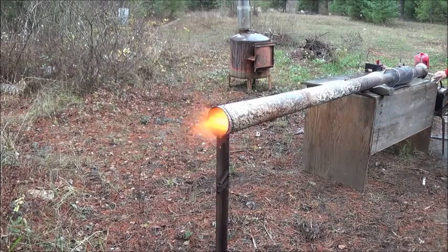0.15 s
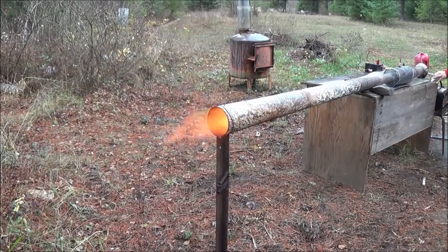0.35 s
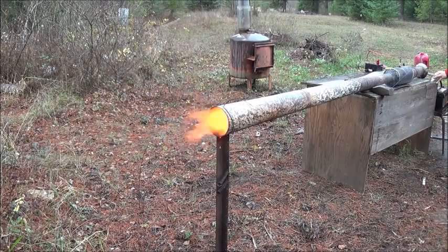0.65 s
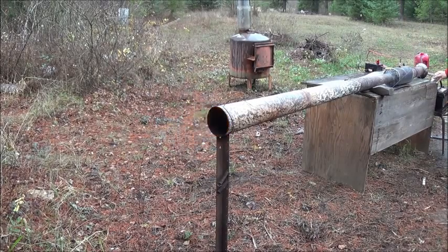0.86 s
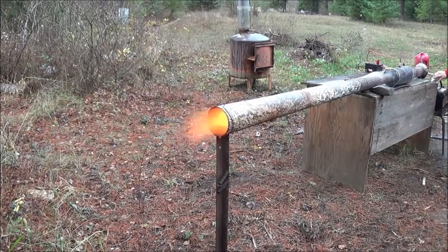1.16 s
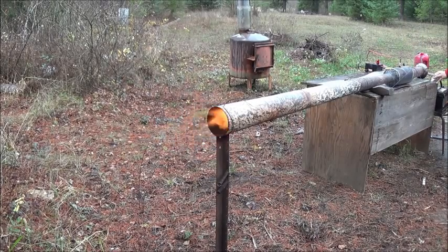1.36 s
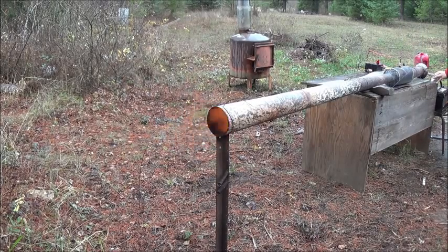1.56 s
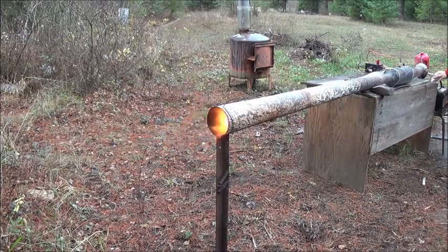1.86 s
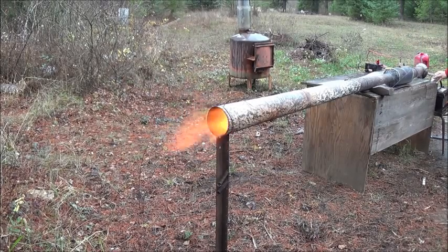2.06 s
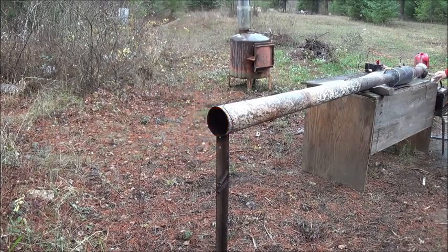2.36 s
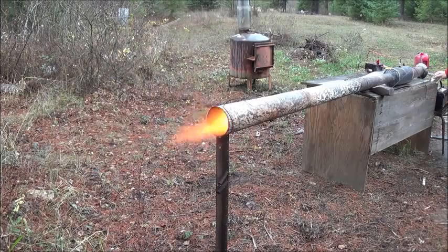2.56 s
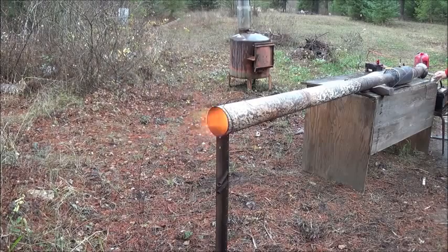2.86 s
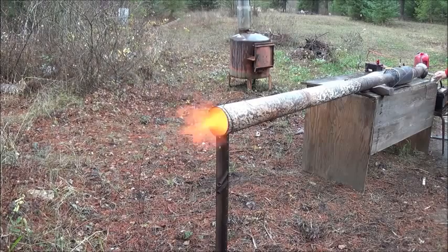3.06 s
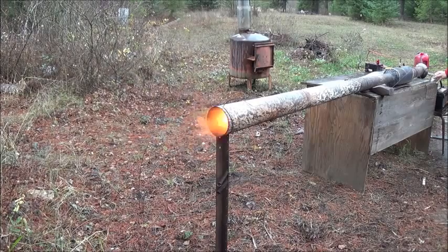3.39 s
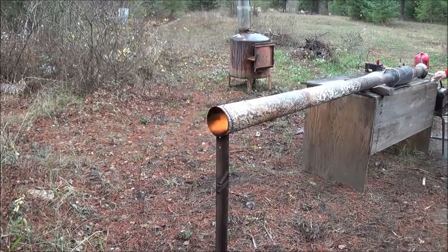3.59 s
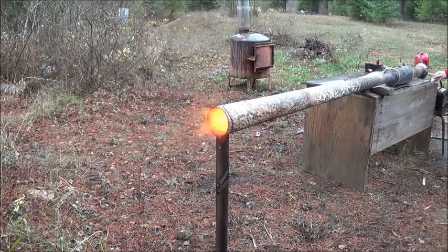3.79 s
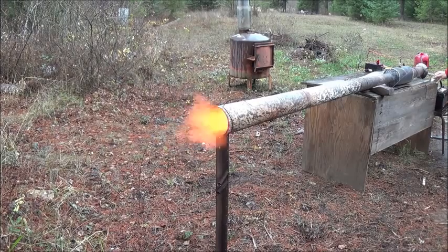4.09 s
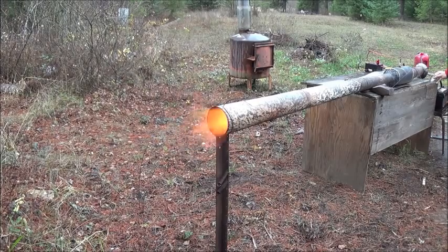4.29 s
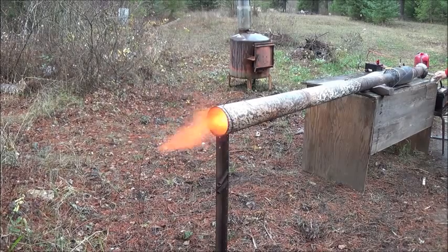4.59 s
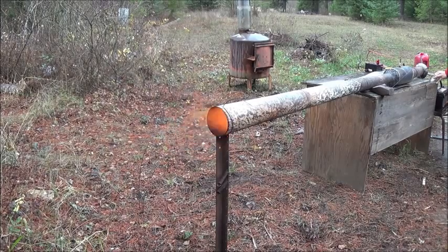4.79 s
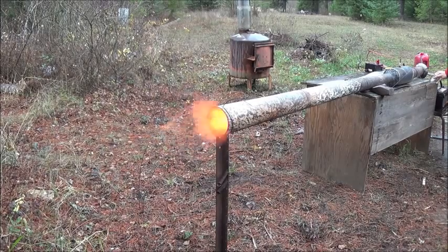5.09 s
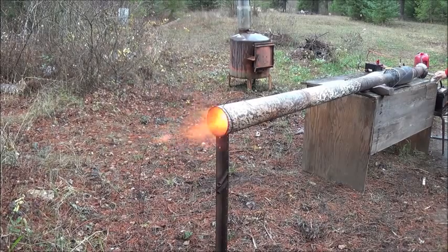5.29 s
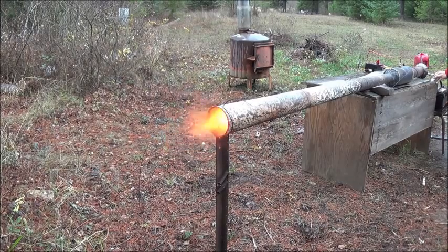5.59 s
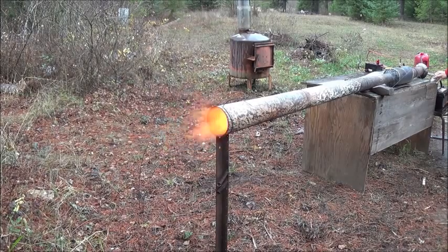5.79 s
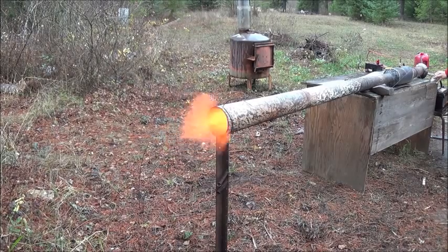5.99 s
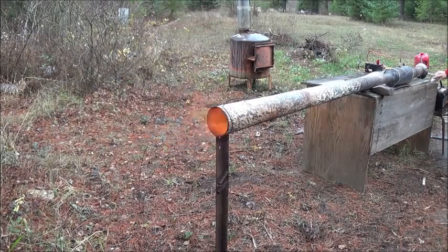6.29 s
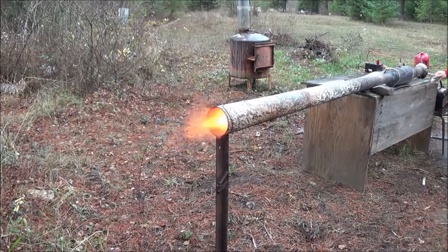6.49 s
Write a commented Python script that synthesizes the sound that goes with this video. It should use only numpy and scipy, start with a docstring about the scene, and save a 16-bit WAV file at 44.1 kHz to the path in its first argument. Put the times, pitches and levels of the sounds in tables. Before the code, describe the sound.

Continuous deep blare of a pulsed combustion engine outdoors, already running at the start and still running at the end. The pitch stays near a low A, trembling slightly. Torn, gritty gas noise and brighter hiss pulse with each firing and swell in short flares. Scattered hard snaps and hollow barks pop out. Midway the drone sags, hiccups once and recovers. The microphone is near, the sound dry, with low rumble beneath.

```python
"""Outdoors over soil, a large pulse jet fires about 107 times a second, a few metres from the microphone.
Each explosion sends a pressure pulse and a gust of turbulent gas down the long tailpipe: drone and roar.
The flame at the mouth rasps and hisses in uneven flares, and now and then a firing cracks sharply.
Halfway through, the combustion sags, stumbles once and picks up again; a low rumble lies underneath."""
import sys
import numpy as np
from scipy.fft import rfft, irfft, next_fast_len
from scipy.io import wavfile
from scipy.ndimage import map_coordinates

SR = 44100
rng = np.random.default_rng(int(sys.argv[2]) if len(sys.argv) > 2 else 0)


def waveform_to_disk(signal):
    """Save audio, clipped to [-1, 1], as 16-bit WAV at the path in sys.argv[1]."""
    frames = np.transpose(np.atleast_2d(signal))
    scaled = np.clip(frames, -1, 1) * 32767
    samples = np.round(scaled).astype(np.int16)
    wavfile.write(sys.argv[1], SR, samples)


N = 293265  # length in samples

# low, torn part of the jet turbulence, relative levels: freq_hz [Hz], level_db [dB per Hz]
RASP_SPECTRUM = [(400, 1), (1000, 3), (1800, 4), (2400, 1.5), (3300, 1.5), (5300, -7), (7000, -15),
                 (10000, -13), (16000, -58)]
# high part of the jet turbulence, relative levels: freq_hz [Hz], level_db [dB per Hz]
HISS_SPECTRUM = [(2000, -5.5), (5000, -2), (7200, -8.5), (8800, 1), (10200, 3), (11800, -1), (13500, -19),
                 (15600, -61)]


def amp(db):
    """Decibels to gain."""
    return 10 ** (np.asarray(db) / 20)


def unit(x):
    """Scale to rms 1."""
    return x / np.sqrt(np.mean(x ** 2) + 1e-20)


def along(points, hz, axis=1):
    """Read one column of a frequency table on a log axis."""
    table = np.transpose(points)
    return np.interp(np.log(hz + 1), np.log(table[0] + 1), table[axis])


def curve(rows):
    """One value per sample from a table of time and value."""
    time_s, value = np.transpose(rows)
    return np.interp(np.arange(N) / SR, time_s, value)


def wobble(rate):
    """A smooth random curve around zero, rate knots a second."""
    knots = rng.standard_normal(N // 16)
    position = np.arange(N) * rate / SR + 2
    return map_coordinates(knots, [position], mode="wrap")


def filtered(x, response):
    """x times a complex response of frequency."""
    size = 2 * next_fast_len(N)
    hz = np.fft.rfftfreq(size, 1 / SR)
    return irfft(rfft(x, size) * response(hz), size)[..., :N]


def coloured(x, spectrum):
    """Causal filter with the given (Hz, dB) shape."""
    def response(hz):
        # folding the cepstrum onto positive time gives minimum phase
        cepstrum = irfft(np.log(amp(along(spectrum, hz))))
        cepstrum[1:len(hz) - 1] *= 2
        cepstrum[len(hz):] = 0
        return np.exp(rfft(cepstrum))
    return filtered(x, response)


def noise(side_db):
    """Stereo white noise, mostly common to both microphone ports."""
    mid, side = rng.standard_normal((2, N))
    side = amp(side_db) * side
    return unit(np.array([mid + side, mid - side]))


def ground(x):
    """The bounce off the soil hollows the sound at regular steps; leaf litter soaks up its treble."""
    delay_s = .00248  # by which the bounce trails the direct sound

    def direct_and_bounce(hz):
        delayed = np.exp(-2j * np.pi * hz * delay_s)
        return 1 + .4 * delayed / (1 + (hz / 3500) ** 2)
    return filtered(x, direct_and_bounce)


def firing_cycle():
    """Running count of firings: the rate drifts around the pipe's own note and single firings slip."""
    # drift of the firing rate, before the quick wander: time_s [s], rate_hz [Hz]
    rate_drift = [(0, 105.5), (.35, 108.3), (.6, 106.4), (.93, 107.3), (1.1, 108.7), (1.8, 107.5),
                  (2.45, 105.9), (3.25, 108.5), (3.82, 106.6), (4.0, 108.9), (4.3, 108.5), (4.55, 105),
                  (4.82, 108.6), (5.25, 105.8), (5.95, 108.1), (6.65, 108)]
    wander_hz, slip_cycles = 1.895, 0.023  # both per unit of wobble
    rate_hz = curve(rate_drift) + wander_hz * wobble(26)
    return np.cumsum(rate_hz) / SR + slip_cycles * wobble(48)


def firings(cycle, scatter_s, size_db):
    """One impulse per cycle; each charge ignites a little early or late, with its own force."""
    starts = np.interp(np.arange(int(cycle[-1]) + 1), cycle, np.arange(N))
    timing, force = rng.standard_normal((2, len(starts)))
    at = np.clip(np.round(starts + scatter_s * SR * timing), 0, N - 1).astype(int)
    return np.bincount(at, amp(size_db * force), N)


def drone(cycle):
    """Each firing pushes air out of the mouth and then sucks it back about as hard."""
    # pressure pulse of one firing, relative levels: freq_hz [Hz], level_db [dB]
    blast_spectrum = [(30, -75), (70, -2.5), (105, 6), (150, -6), (185, 1.5), (225, 8), (280, -6),
                      (335, 1.5), (430, 1), (490, -19), (900, -29), (2000, -82.5)]
    pulses = firings(cycle, scatter_s=0.00031, size_db=1.42) * amp(1.08 * wobble(28))
    push_then_suck = -1j  # a quarter turn makes each pulse swing both ways
    return unit(filtered(coloured(pulses, blast_spectrum), lambda hz: push_then_suck))


def gust(cycle, rise, fall, rest_db):
    """Gain that leaps at each firing and dies away within the cycle; times in cycles."""
    age = cycle % 1
    return (1 - np.exp(-age / rise)) * np.exp(-age / fall) + amp(rest_db)


def roar(cycle):
    """Gusts of burning gas ring the tailpipe's resonances."""
    # gas in the tailpipe, relative levels: freq_hz [Hz], level_db [dB per Hz]
    pipe_spectrum = [(70, -21), (145, -3.5), (250, -9), (360, -8.5), (412, 2), (450, -8.5), (500, -11.5),
                     (605, -5), (670, -16.5), (780, -12), (1030, -18.5), (1280, -18.5), (1600, -24.5),
                     (1900, -32), (3500, -52.5)]
    force = gust(cycle, rise=0.017, fall=0.29, rest_db=-11.5) * amp(1.42 * wobble(90))
    return unit(ground(coloured(noise(side_db=-19.5) * force, pipe_spectrum)))


def pipe(cycle):
    """Drone and roar follow the strength of the combustion, which sags for a while in the middle."""
    # strength of the combustion: time_s [s], level_db [dB]
    strength = [(0, -0.1), (2.7, 0), (2.9, -1.9), (3.35, -2.4), (3.55, 0), (4.65, -0.1), (5.0, -0.5),
                (6.65, -0.2)]
    blast_db, roar_db = -10, -18.5  # levels at full strength
    return amp(curve(strength)) * (amp(blast_db) * drone(cycle) + amp(roar_db) * roar(cycle))


def gate(cycle, centre, depth_db):
    """Gain that peaks once a cycle, while gas rushes out."""
    return amp(depth_db * np.cos(np.pi * (cycle - centre)) ** 4)


def flares(t):
    """Unburnt fuel flares at the mouth: rise of rasp and hiss in dB, each with its own flicker."""
    # flares: centre_s [s], length_s [s], rasp_rise_db [dB], hiss_rise_db [dB]
    fuel_flares = [(.08, .14, 5, 1), (.17, .06, 0, 5), (.3, .11, 7, 4), (.45, .05, 6, 7), (.74, .04, 7, 4),
                   (.86, .1, 3, 4), (1.0, .045, 5, 9), (1.08, .04, 1, 6), (1.33, .045, 3, 7),
                   (1.77, .1, 5, 5), (1.98, .13, 3, 5), (2.14, .06, 3, 5), (2.29, .11, 3, 7),
                   (2.63, .1, 4, 6), (3.13, .13, 5, 3), (3.45, .05, 4, 8), (3.64, .11, 6, 6),
                   (3.8, .11, 3, 6), (3.97, .11, 4, 3), (4.12, .05, 5, 5), (4.48, .11, 1, 8),
                   (4.93, .06, 4, 5), (5.15, .05, 5, 9), (5.33, .07, 1, 8), (5.52, .12, 2, 6),
                   (5.92, .04, 6, 5), (6.1, .16, 4, 5), (6.26, .04, 2, 7), (6.56, .06, 4, 3)]
    flicker_db, flicker_per_s = 0.9, 20  # dB per unit of wobble, knots a second
    rise_db = np.zeros((2, N))
    for centre_s, length_s, rasp_db, hiss_db in fuel_flares:
        swell = np.exp(-(2 * (t - centre_s) / length_s) ** 2)
        rise_db += np.outer([rasp_db, hiss_db], swell)
    return rise_db + flicker_db * np.array([wobble(flicker_per_s), wobble(flicker_per_s)])


def jet(cycle, t):
    """Each slug of gas tears at the air; the flame flares unevenly from cycle to cycle."""
    rasp_rise_db, hiss_rise_db = flares(t)
    uneven = amp(0.75 * wobble(30) + 1.81 * wobble(170))
    rasp_force = uneven * gate(cycle, centre=0.061, depth_db=4.5) * amp(1.3 * wobble(60))
    hiss_force = uneven * gate(cycle, centre=0.11, depth_db=5.5) * amp(1.6 * wobble(35))
    rasp = unit(ground(coloured(noise(side_db=-11.0) * rasp_force, RASP_SPECTRUM)))
    hiss = unit(coloured(noise(side_db=-8.0) * hiss_force, HISS_SPECTRUM))
    # base levels are those between flares
    return amp(-39 + rasp_rise_db) * rasp + amp(-44 + hiss_rise_db) * hiss


def stumble(t):
    """Gain that dips briefly where the flame nearly goes out."""
    # stumbles: centre_s [s], half_length_s [s], depth_db [dB]
    stumbles = [(3.423, .015, -7)]
    return amp(sum(db * np.exp(-((t - s) / half) ** 2) for s, half, db in stumbles))


def cracks(cycle, t, width_s, crack_db, bark_db):
    """A hard firing barks through the pipe and leaves the mouth with a burst of sharp noise."""
    # hard firings, relative levels: time_s [s], crack_level_db [dB], bark_level_db [dB]
    hard_firings = [(0.2733, -23, -18), (0.4489, -14, -26), (0.7397, -11, -21), (0.7846, -14, -37),
                    (0.8614, -22, -28), (1.7604, -18, -30), (2.1156, -12.5, -40), (2.2518, -23, -17.5),
                    (2.8275, -20, -20), (2.8833, -21.5, -19), (3.0131, -14.5, -34), (3.0599, -13, -28),
                    (3.1183, -28, -25), (3.6187, -7, -14.5), (3.6592, -15, -21), (4.2114, -33, -27),
                    (4.9784, -45, -28), (5.8192, -15.5, -36), (5.9224, -26, -18.5), (6.1804, -34, -19)]
    # body of a hard firing, relative levels: freq_hz [Hz], level_db [dB per Hz]
    bark_spectrum = [(300, -20), (700, 0), (1300, -2), (2200, -10), (5000, -28)]
    sharp, dull = np.zeros((2, N))
    for time_s, sharp_db, dull_db in hard_firings:
        firing = np.round(np.interp(time_s, t, cycle))  # the nearest firing
        peak_s = np.interp(firing + 0.12, cycle, t)
        away = np.abs(t - peak_s) / width_s
        near = away < 10
        burst = np.exp(-away[near])
        sharp[near] += amp(sharp_db + crack_db) * burst
        dull[near] += amp(dull_db + bark_db) * burst
    crack = unit(coloured(noise(side_db=-16), RASP_SPECTRUM))
    crack = crack + amp(-9.5) * unit(coloured(noise(side_db=-6), HISS_SPECTRUM))
    bark = unit(coloured(noise(side_db=-24), bark_spectrum))
    return ground(sharp * crack + dull * bark)


def rumble():
    """Steady low noise underneath, independent of the firings."""
    # rumble, relative levels: freq_hz [Hz], level_db [dB per Hz]
    rumble_spectrum = [(15, 4), (40, -30), (75, 17.5), (130, 21), (300, -37), (1000, -101)]
    return amp(-28) * unit(coloured(noise(side_db=-13), rumble_spectrum))


def scene():
    """One firing cycle drives the drone, the roar, the jet and the cracks, over the rumble."""
    t = np.arange(N) / SR
    cycle = firing_cycle()
    engine = stumble(t) * (pipe(cycle) + jet(cycle, t))
    hard = cracks(cycle, t, width_s=0.0012, crack_db=-11, bark_db=1.5)
    return engine + hard + rumble()


def record(dry):
    """Two microphone ports differ in phase and level; the highest peaks are rounded, the band limited."""
    # the two ports: freq_hz [Hz], left_lead_rad [rad], left_minus_right_db [dB]
    port_response = [(20, -.3, .4), (107, -.82, -.4), (215, -1.02, -1.3), (400, -.87, -2.7),
                     (780, -.25, -2.9), (1400, 0, -1.8), (4400, 0, -.8), (10000, 0, -.3)]
    top_hz = 15650
    side = np.array([[.5], [-.5]])  # half the difference to each port

    def ports(hz):
        phase = np.exp(1j * side * along(port_response, hz))
        return phase * amp(side * along(port_response, hz, axis=2))
    x = filtered(dry, ports)
    x = x / (1 + np.abs(x) ** 8) ** (1 / 8)  # rounds peaks near full scale
    return filtered(x, lambda hz: hz / np.hypot(hz, 15) * (hz < top_hz))


dry = scene()
out = record(dry)
waveform_to_disk(out)
```